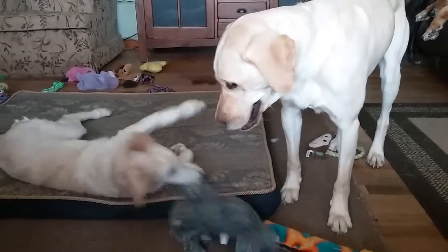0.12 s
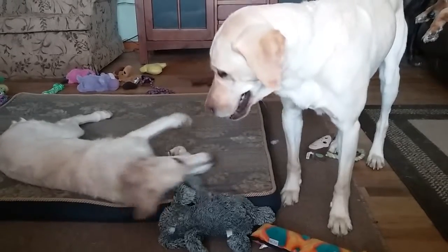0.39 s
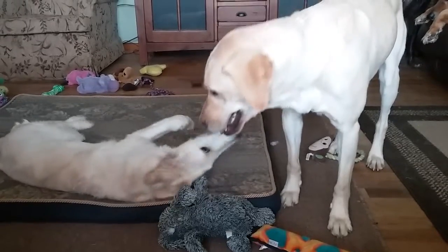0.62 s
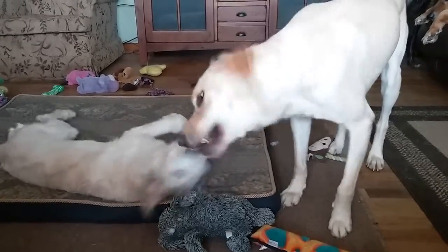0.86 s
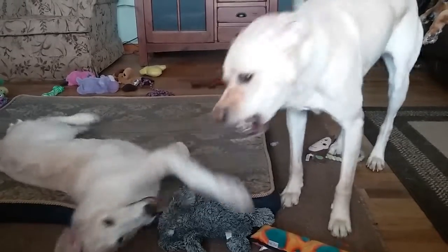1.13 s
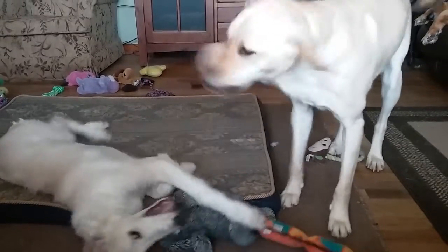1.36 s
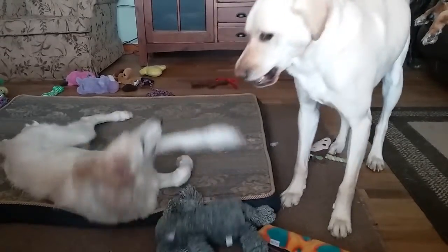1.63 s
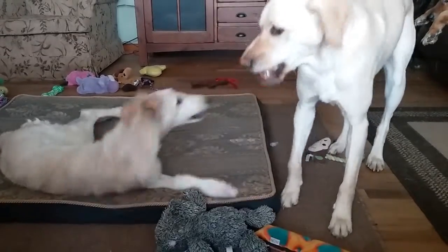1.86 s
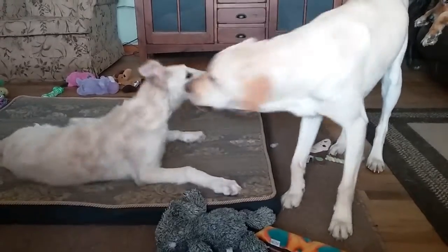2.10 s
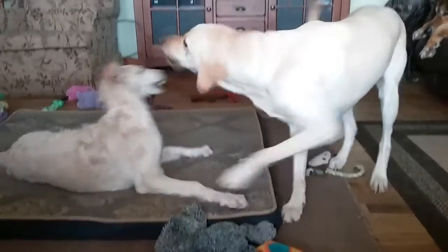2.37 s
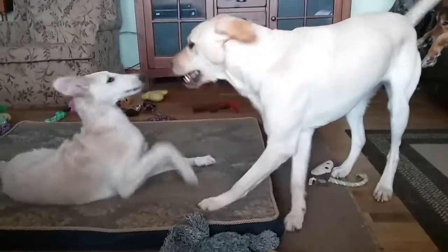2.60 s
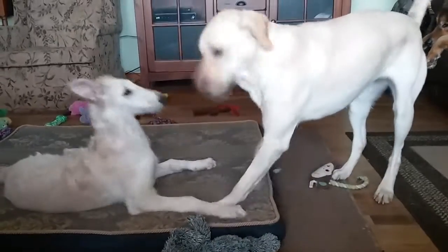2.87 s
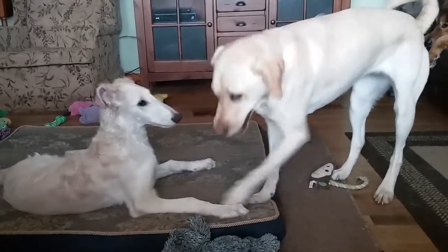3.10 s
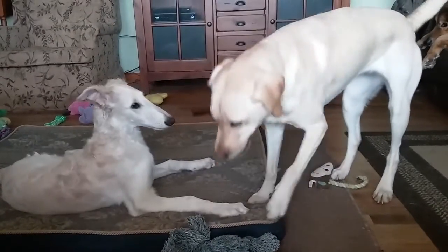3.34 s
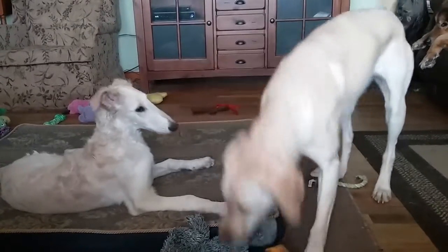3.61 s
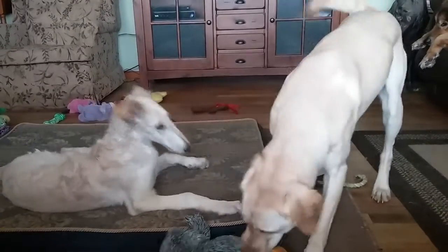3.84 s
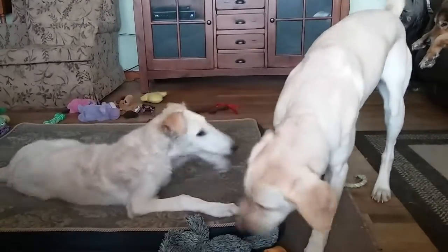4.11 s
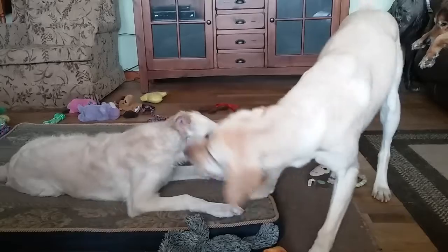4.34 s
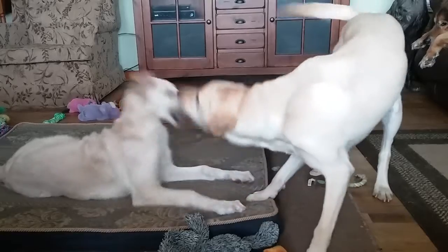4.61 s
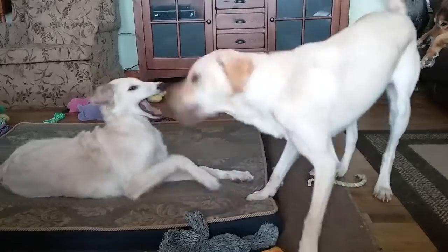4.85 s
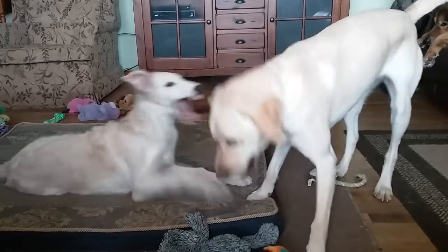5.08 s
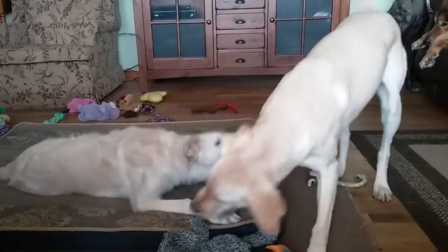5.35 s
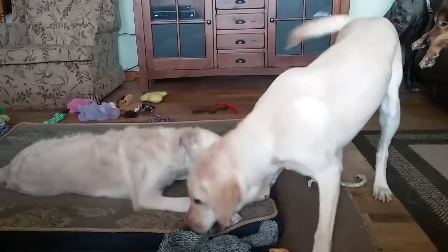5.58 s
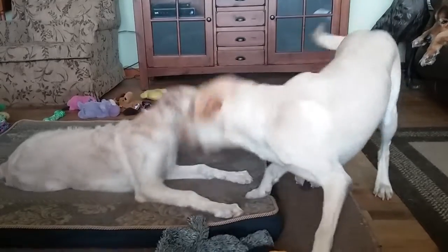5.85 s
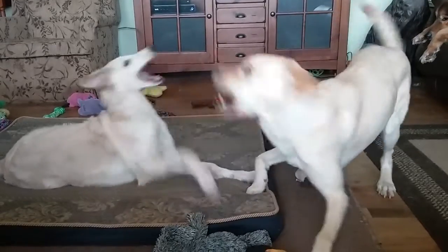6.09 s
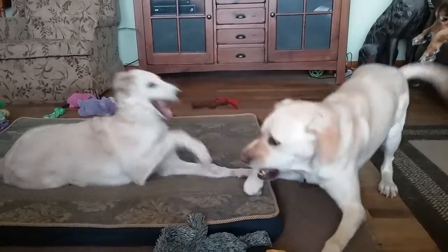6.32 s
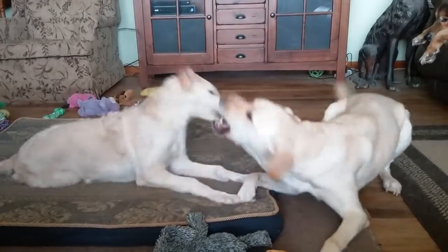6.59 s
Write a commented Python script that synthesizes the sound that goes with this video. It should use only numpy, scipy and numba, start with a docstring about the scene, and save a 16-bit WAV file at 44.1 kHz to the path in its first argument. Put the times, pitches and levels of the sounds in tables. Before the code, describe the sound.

In a reverberant living room, two large dogs wrestle close to a phone microphone. Fur scrapes on cloth and claws tick, then a short grunt leads to a loud cracking bark and another sharp bark. After a quiet gap a stepped-on toy squeaks twice quickly. Low grunts, heavy rubbing and a thud follow, then a rough growl, a short throaty call and a last upward-breaking bark.

```python
"""Big dogs play-fight on a cushion in a living room: grunts, barks and a growl, puffs of air ringing a throat and mouth.
A stepped-on toy squeaks with a pulsing reed; paws thud as soft noise pushes, claws tick as short rings.
Fur scrapes on cloth as grainy filtered noise, over a low hum and hiss; the room adds a dense decay and
standing waves. A limiter holds the peaks down and the converter overflows at listed moments."""
import sys
import numpy as np
from scipy import signal
from scipy.fft import rfft, irfft, next_fast_len
from scipy.io import wavfile
from scipy.ndimage import uniform_filter1d, minimum_filter1d
from numba import njit

SR = 44100
rng = np.random.default_rng(int(sys.argv[2]) if len(sys.argv) > 2 else 0)


def ratio_of_db(decibels):
    """Turn decibels (scalar or array-like) into linear amplitude factors; 0 dB maps to 1."""
    return 10 ** (np.asarray(decibels, float) / 20)


def master_out(mix):
    """Clip the mix to full scale and print it as 16-bit PCM to the path in sys.argv[1]."""
    frames = np.transpose(np.atleast_2d(mix))
    ceiling = np.clip(frames, -1, 1)
    pcm = np.round(ceiling * 32767).astype(np.int16)
    wavfile.write(sys.argv[1], SR, pcm)


N = 295911
T = np.arange(N) / SR

# dog calls, one list each: (time [s], pitch [Hz], throat drive [dB], mouth opening [0-1], chest over throat [dB])
CALLS = [
    [(0.932, 300, -24.5, 0, -21), (0.963, 276.8, -27, 0.55, -4), (1.003, 223, -44, 0.25, -7),
     (1.03, 209.3, -46, 0.3, -17)],
    [(1.195, 215.2, -37, .3, 1), (1.256, 232.9, -21, 0.58, -8.5), (1.274, 238.1, -22, 0.66, -20),
     (1.288, 354, -11, 0.71, -6), (1.31, 367.9, -18, .72, -26.5), (1.325, 534.3, -15, 0.9, -23),
     (1.345, 562.7, -14, 0.9, -15), (1.375, 466.6, -20.5, 0.91, -22), (1.41, 450.7, -24, 0.85, -19)],
    [(2.27, 207.4, -55, 0, 9.5), (2.295, 631.6, -38.5, 0.93, 2.5), (2.331, 603.4, -16.5, .8, -28.5),
     (2.355, 524, -23, 0.93, -32), (2.385, 502.5, -16, .8, -29), (2.415, 475.2, -23.5, 0.77, -24.5),
     (2.44, 484.5, -20, 0.92, -35)],
    [(4.49, 104.9, -40.5, 0.5, 3.5), (4.508, 108.1, -44.5, 0.4, 14.5), (4.552, 103.7, -42.5, 0.57, 7.5),
     (4.6, 103, -67, 0.99, -25)],
    [(4.74, 104.7, -57, 0.5, 3.5), (4.76, 102.4, -49.5, 0, 21.5), (4.794, 105.9, -37, 0, 10),
     (4.85, 104.3, -43, 0.96, -7), (4.93, 103.2, -53.5, 0.82, -15)],
    [(5.414, 313.1, -34.5, 0.44, 1), (5.44, 283.8, -26.5, 0.53, -6), (5.466, 270.1, -24.5, 0.76, -5),
     (5.486, 262.1, -19.5, 0, -2.5), (5.496, 125.9, -27.5, 0, -14), (5.52, 125.5, -30, 0.6, 8),
     (5.602, 120.3, -21.5, 0.15, -3), (5.712, 121.7, -26, 0.42, 2.5), (5.75, 117.2, -21.5, 0.38, 0),
     (5.8, 110.2, -29.5, 0.51, 0), (5.83, 119, -32, 0.4, 8.5), (5.874, 125, -35, 0.62, 11.5),
     (5.954, 119.1, -32, 0.34, 7.5), (5.976, 133.6, -22.5, 0.73, -3)],
    [(5.984, 196.1, -16, 0.45, -28), (6.026, 194.6, -29, 1, -43), (6.072, 191.9, -29.5, 0.63, 0),
     (6.13, 191.3, -36.5, 0.91, -9.5)],
    [(6.425, 119.7, -60.5, 0, 14), (6.462, 138.1, -35.5, .65, 10.5), (6.476, 300, -25.5, .92, -10.5),
     (6.495, 385.7, -17, .85, -24), (6.52, 444.5, -20, .85, -16.5), (6.538, 609.5, -16.5, 0.85, -30.5),
     (6.556, 587.2, -24, 1, -19), (6.576, 595.3, -20, 0, -20), (6.64, 556.5, -22, 0.69, -14.5)],
]
# head of each call, mouth half open: (mouth resonance [Hz], nose gain [dB], teeth hiss gain [dB])
CALL_HEADS = [(1180, -10.5, -33), (1266, -10.5, -31), (1233, -16, -35), (1100, -8, -31), (1030, 4, -21.5),
              (1180, -15.5, -36.5), (1243, 0, -34), (1314, -7.5, -30.5)]
# roughness of each call below the voice break: (roughness [0-1])
CALL_ROUGHNESS = [.05, .12, .09, .12, .2, .24, .1, .05]
# moments when the nose resonance swells: (time [s], extra gain [dB], half length [s])
NOSE_SWELL_MOMENTS = [(5.44, 16, .04), (5.791, 10, 0.025), (5.925, 8.5, .03)]
# toy reed, one list a squeak: (time [s], pitch [Hz], level before the room [dB])
TOY_SQUEAKS = [
    [(3.6, 512, -44.5), (3.606, 512, -35.5), (3.63, 588, -27.5), (3.644, 569.6, -30), (3.68, 564, -46.5)],
    [(3.685, 497, -44), (3.687, 488, -30.5), (3.701, 484.5, -38.5), (3.747, 457.7, -37), (3.81, 454, -60)],
]
# tone of the toy: (frequency [Hz], relative gain [dB])
TOY_TONE = [(210, -11), (350, -7.5), (595, -13), (729, -6), (1110, -7.5), (3120, -9), (4630, -3),
            (5370, -11), (9000, -53), (11700, -70), (19800, -120)]
# paws and bodies landing on floor and cushion: (time [s], push level [dB], centre [Hz], push rise [ms])
PAW_THUDS = [(1.838, -57.5, 103.7, 22), (1.909, -60, 86.1, 17), (2.917, -51.5, 358.6, 6.6),
             (5.148, -53, 580, 18), (5.21, -34, 181, 4.7)]
# claws and teeth ticking: (time [s], level before the room [dB], pitch [Hz])
CLAW_TICKS = [(0.757, -42.5, 1180), (0.827, -36.5, 5160), (1.07, -40.5, 764), (5.152, -41.5, 1205),
              (5.292, -38, 880)]
# fur and cloth scraping: (peak time [s], level [dB], rise over 20 dB [s], fall over 20 dB [s], treble over body [dB])
SCRAPES = [(0.129, -56, 0.31, 0.22, -1.5), (.765, -62, 0.076, 0.12, -10), (0.919, -54, .05, .05, -11),
           (1.071, -42.5, 0.066, 0.12, -12.5), (1.19, -51.5, .05, 0.14, -5.5),
           (1.86, -54.5, 0.055, 0.26, -24.5), (2.861, -58.5, 0.073, .25, -22),
           (3.18, -66.5, 0.079, 0.23, -22), (3.447, -66, 0.017, 0.17, -25),
           (4.211, -61.5, 0.17, 0.69, -14.5), (4.557, -34, 0.099, 0.063, -26),
           (4.599, -46, 0.096, .25, -23), (4.848, -27.5, 0.08, 0.13, -28),
           (5.236, -42, 0.065, 0.041, -17.5), (5.336, -48, 0.16, 0.087, -17),
           (6.092, -21, 0.013, 0.12, -28.5), (6.179, -50, 0.096, 0.9, -10.5)]
# tone of rubbed cloth: (frequency [Hz], relative gain [dB])
CLOTH_TONE = [(88, -41), (150, -9.5), (349, -18.5), (407, -5), (445, -18.5), (500, -7), (554, -16.5),
              (1120, -7), (1370, -11), (3200, -21.5), (4160, -36.5), (7040, -120)]
# rise and fall of the steady sounds: (time [s], gain [dB])
BACKGROUND_GAIN = [(0, -2), (.9, -2), (1.4, -1), (1.6, -10), (2.3, -12), (2.9, -7.5), (3.3, -23.5),
                   (3.6, -14.5), (3.9, -5.5), (4.4, -5.5), (4.8, 6.5), (5.1, 0.5), (5.7, 8.5), (6.3, 5.5),
                   (6.71, -5)]
# standing waves of the room: (frequency [Hz], relative level [dB])
STANDING_WAVES = [(100, -18.5), (133, 2.5), (225, 2.5), (390, -4), (515, 11), (588, 3), (694, -2.5),
                  (890, 2.5), (1018, -6.5), (1148, -4.5), (1301, -3), (1400, 1), (1529, -3.5), (1640, -5),
                  (1780, -5.5)]
# converter overflows, where the wave jumps to the other rail: (time [s], channel [0 left, 1 right], length [samples])
OVERFLOW_JUMPS = [(1.33575, 0, 4), (1.3816, 0, 4), (1.3388, 1, 6), (1.3406, 1, 5), (1.3689, 1, 3),
                  (2.39125, 1, 4), (2.3954, 1, 3)]

# resonances of the head: (centre [Hz], width [Hz])
CHEST, THROAT, NOSE = (166.6, 170), (621, 500), (1700, 480)
PALATE, TEETH = (2700, 1300), (4750, 1500)
PALATE_DB = -14  # relative to the nose
THROAT_TOP_HZ, MOUTH_TOP_HZ = 903, 2466
# above the break the voice gets rougher and every second puff is weaker
BREAK_HZ, BREAK_WIDTH_HZ, BREAK_ROUGH = 500, 150, .08
HALVES_LOW, HALVES_HIGH = .12, .35
# mouth gain when shut and when wide open; the rest is the change from shut to wide open
MOUTH_SHUT_DB, MOUTH_OPEN_DB = -48, 16.5
NOSE_GAIN_DB, TEETH_GAIN_DB, MOUTH_RISE = 9.5, 22.5, 0.05

TICK_CYCLES = 3.5  # cycles in which a tick decays to 1/e
RUSTLE_DB, RUSTLE_TREBLE_DB = -61.5, -11.5  # treble relative to the rustle
# a share is the part of the background gain that the sound follows
HUM_DB, HUM_SHARE, HUM_WAVER_DB, HUM_WAVER_PER_S = -71, 0.23, 3, 10
HISS_DB, HISS_SHARE = -70, .8
ALIKE_HZ = 480  # below this both ports hear much the same
ROOM_T60_S, ROOM_DB, MODES_DB = 0.42, 4.5, 0.5
TAIL_BASS_HZ = 300  # furniture and walls swallow the diffuse bass below this
TAIL_LEFT_DB, PORT_LAG_SAMPLES = 2, 2
LIMIT, LIMIT_S = .93, .004


def dogs():
    """Each call sends puffs and breath from the vocal folds through chest, throat, mouth, nose and teeth."""
    out = np.zeros(N)
    for table, head_settings, rough in zip(CALLS, CALL_HEADS, CALL_ROUGHNESS):
        span, (hz, db, opening, chest_db), fade = read(table, 0.012)
        air, breath = larynx(hz, ratio_of_db(db) * fade, rough)
        out[span] += head(air, breath, opening, chest_db, T[span], *head_settings)
    return out


def larynx(hz, drive, rough):
    """Vocal folds release jittered puffs; breath noise surges at each puff and dies away within the cycle."""
    high = np.clip((hz - BREAK_HZ) / BREAK_WIDTH_HZ + .5, 0, 1)
    rough = rough + BREAK_ROUGH * high
    length_chance, size_chance = rng.standard_normal((400, 2)).T
    cycle = np.arange(400)
    cycles_passed = np.cumsum(hz) / SR

    def each_cycle(curve):
        """Value of a curve at the start of each cycle."""
        return np.interp(cycle, cycles_passed, curve)

    # every second puff weaker draws lines at half the pitch
    halves = HALVES_LOW + (HALVES_HIGH - HALVES_LOW) * each_cycle(high)
    cycle_rough = each_cycle(rough)
    size = ratio_of_db(8 * cycle_rough * size_chance) * (1 - halves * (cycle % 2))
    stretch = 1 + .1 * cycle_rough * np.clip(length_chance, -2, 2)
    pulses, phase = folds(hz, stretch, size)
    breath = rng.standard_normal(len(hz)) * 2.71 * np.exp(-phase / 0.53) * drive
    air = np.sqrt(1 - rough) * pulses * drive + np.sqrt(rough) * breath
    return air, breath


@njit
def folds(hz, stretch, size):
    """A puff at each wrap of the phase, shared between two samples; every cycle has its own length and size."""
    pulses, phase = np.zeros(len(hz) + 1), np.empty(len(hz))
    position, k = .9, 0
    for i in range(len(hz)):
        step = hz[i] * stretch[k] / SR
        position += step
        if position >= 1:
            position, k = position - 1, k + 1
            late = position / step
            pulses[i] += size[k] * late
            pulses[i + 1] += size[k] * (1 - late)
        phase[i] = position
    return pulses[:-1] * np.sqrt(SR / hz), phase


def head(air, breath, opening, chest_db, t, mouth_hz, nose_db, hiss_db):
    """Cavities ring side by side; an opening mouth lifts its own pitch and the mouth, nose and teeth levels."""
    throat = ring(air, *THROAT) + ratio_of_db(chest_db) * ring(air, *CHEST)
    wide = opening - .5
    mouth_db = MOUTH_SHUT_DB + (MOUTH_OPEN_DB - MOUTH_SHUT_DB) * opening
    mouth = ratio_of_db(mouth_db) * ring(air, mouth_hz * (1 + MOUTH_RISE * wide), 680)
    swell_db = sum(gain_db * np.exp(-((t - s) / half_s) ** 2) for s, gain_db, half_s in NOSE_SWELL_MOMENTS)
    open_nose_db = nose_db + NOSE_GAIN_DB * wide
    mouth += ratio_of_db(open_nose_db + swell_db) * ring(air, *NOSE)
    # past the teeth the air is mostly turbulent
    teeth = ratio_of_db(hiss_db + TEETH_GAIN_DB * wide) * ring(0.29 * air + breath, *TEETH)
    palate = ratio_of_db(PALATE_DB + open_nose_db) * ring(air, *PALATE)
    return below(throat, THROAT_TOP_HZ) + below(mouth, MOUTH_TOP_HZ) + teeth + palate


def toy():
    """A reed snaps shut once a cycle: bright steady pulses, higher when squeezed, lower when it refills."""
    out = np.zeros(N)
    for table in TOY_SQUEAKS:
        span, (hz, db), fade = read(table)
        stretch = 1 + 0.0089 * rng.standard_normal(400)
        size = ratio_of_db(0.48 * rng.standard_normal(400))
        pulses, _ = folds(hz, stretch, size)
        air_noise = 0.25 * rng.standard_normal(len(hz))
        out[span] += colour(pulses + air_noise, TOY_TONE) * ratio_of_db(db) * fade
    return out


def paws():
    """Thuds are soft pushes of noise on a broad resonance; ticks are short decaying rings."""
    out = np.zeros(N)
    t = T[:SR // 8]
    for s, db, hz, push_ms in PAW_THUDS:
        rise = t / (push_ms / 1000)
        push = rise * np.exp(1 - rise)
        thud = ring(rng.standard_normal(len(t)) * push, hz, 1.4 * hz)
        out[int(s * SR):][:len(t)] += ratio_of_db(db) * thud
    for s, db, hz in CLAW_TICKS:
        tick = np.sin(2 * np.pi * hz * t) * np.exp(-t * hz / TICK_CYCLES)
        out[int(s * SR):][:len(t)] += ratio_of_db(db) * tick
    return out


def scuffle():
    """Grainy rubbing of fur on cloth with a breathy treble, in bursts over a rustle."""
    grains = [colour(rng.standard_normal(N) * ratio_of_db(2.1 * walk(60)), CLOTH_TONE) for _ in range(3)]
    body = alike(np.array(grains))
    treble = np.array([ring(rng.standard_normal(N) * ratio_of_db(0.9 * walk(40)), 3940, 2800) for _ in range(2)])
    body_level = ratio_of_db(RUSTLE_DB + background())
    treble_level = body_level * ratio_of_db(RUSTLE_TREBLE_DB)
    for s, db, rise_s, fall_s, treble_db in SCRAPES:
        burst = ratio_of_db(db - 20 * np.maximum((s - T) / rise_s, (T - s) / fall_s))
        # independent noises add by power
        body_level = np.hypot(body_level, burst)
        treble_level = np.hypot(treble_level, burst * ratio_of_db(treble_db))
    return body_level * body + treble_level * treble


def room_tone():
    """A wavering low hum, the same left and right, under faint microphone hiss."""
    waver_db = HUM_WAVER_DB * walk(HUM_WAVER_PER_S)
    hum = ring(rng.standard_normal(N), 105, 64) * ratio_of_db(HUM_DB + HUM_SHARE * background() + waver_db)
    treble = signal.butter(2, 5000, "high", fs=SR, output="sos")
    hiss = signal.sosfilt(treble, rng.standard_normal((2, N)))
    return hum + hiss * ratio_of_db(HISS_DB + HISS_SHARE * background())


def background():
    """Gain curve in dB of the rustle, followed in part by hum and hiss."""
    return np.interp(T, *np.transpose(BACKGROUND_GAIN))


def room(x):
    """Direct sound reaches one port a little later; a dense decay follows, alike in the bass, with standing waves."""
    t = T[:int(.9 * SR)]
    noise = rng.standard_normal((3, len(t)))
    bass_cut = signal.butter(1, TAIL_BASS_HZ, "high", fs=SR, output="sos")
    tail = signal.sosfilt(bass_cut, alike(noise))
    # echoes thicken over the first milliseconds
    decay = np.exp(-np.log(1000) * t / ROOM_T60_S) * np.clip(t / 0.0096, 0, 1)
    tail = ratio_of_db(ROOM_DB) * tail / np.sqrt(np.sum((tail * decay) ** 2) / 2)
    # short waves reach the two ports out of step
    shift = rng.uniform(-0.28, 1, (len(STANDING_WAVES), 2, 1))
    waves = sum(ratio_of_db(db) * np.sin(2 * np.pi * hz * t + k * hz / 600)
                for (hz, db), k in zip(STANDING_WAVES, shift))
    response = decay * (tail + ratio_of_db(MODES_DB) * waves * 80 / SR)
    wet = signal.fftconvolve(x[None], response, axes=1)[:, :N]
    wet[0] *= ratio_of_db(TAIL_LEFT_DB)
    direct = np.array([x * ratio_of_db(5.0), np.roll(x, PORT_LAG_SAMPLES) * ratio_of_db(3.5)])
    return direct + wet


def alike(noise):
    """Two of three noises, sharing the bass of the third."""
    bass = signal.butter(1, ALIKE_HZ, fs=SR, output="sos")
    return noise[:2] + signal.sosfilt(bass, noise[2] - noise[:2])


@njit
def svf(x, hz, width):
    """State-variable band-pass with a moving centre, gain 1 there."""
    y, band, low = np.empty(len(x)), 0., 0.
    for i in range(len(x)):
        g, k = np.tan(np.pi * hz[i] / SR), width / hz[i]
        v = (band + g * (x[i] - low)) / (1 + g * (g + k))
        band, low, y[i] = 2 * v - band, low + 2 * g * v, k * v
    return y


def ring(x, hz, width):
    """A steep resonance (applied twice); white input of rms 1 comes out near rms 1."""
    hz = np.clip(hz + 0 * x, 30, SR / 3)
    width = 1. * width
    return svf(svf(x, hz, width), hz, width) * np.sqrt(2 * SR / np.pi / width)


def below(x, hz):
    """Steep low-pass: the dark valley above a group of resonances."""
    return signal.sosfilt(signal.cheby1(5, 1, hz, fs=SR, output="sos"), x)


def colour(x, points):
    """Filter by (frequency [Hz], gain [dB]) points and scale to rms 1."""
    hz, db = np.transpose(points)
    size = next_fast_len(len(x))
    f = np.maximum(np.arange(size // 2 + 1) * SR / size, 1)
    gain = ratio_of_db(np.interp(np.log(f), np.log(hz), db))
    y = irfft(rfft(x, size) * gain, size)[:len(x)]
    return y / np.std(y)


def read(table, fade_s=0.0032):
    """Sample span of a table, its columns as curves, and a short fade at both ends."""
    s, *columns = np.transpose(table)
    span = slice(int(s[0] * SR), min(int((s[-1] + fade_s) * SR), N))
    t = T[span]
    fade = np.clip(np.minimum(t - t[0], t[-1] - t) / fade_s, 0, 1)
    return span, [np.interp(t, s, c) for c in columns], fade


def walk(rate):
    """Random levels drawn rate times a second and slewed from one to the next; spread near 1."""
    k = int(SR / rate)
    steps = np.repeat(rng.standard_normal(N // k + 1), k)
    return 1.1 * uniform_filter1d(steps, k)[:N]


def scene():
    """Voices, toy and paws share the room; scuffle and room tone are already diffuse."""
    return ratio_of_db(-6.0) * room(dogs() + toy() + paws()) + scuffle() + room_tone()


def roll_off(x):
    """The treble ends steeply here."""
    return signal.sosfilt(signal.butter(12, 16650, fs=SR, output="sos"), x)


def record(dry):
    """The phone drops the deepest bass, a fast limiter holds peaks down, and the wave wraps at listed moments."""
    bass_cut = signal.butter(3, 80, "high", fs=SR, output="sos")
    x = signal.sosfilt(bass_cut, dry)
    size = int(LIMIT_S * SR)
    # the lowest gain nearby, smoothed, so the limiter acts ahead of each peak
    gain = minimum_filter1d(LIMIT / np.maximum(np.abs(x), LIMIT), size=2 * size)
    x = x * uniform_filter1d(gain, size=size)
    for s, channel, count in OVERFLOW_JUMPS:
        i = int(s * SR)
        x[channel, i - 3:i + count + 3] = -0.59
        x[channel, i:i + count] = 1.0
    return roll_off(x)


dry = scene()
out = record(dry)
master_out(out)
```